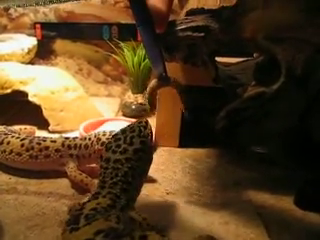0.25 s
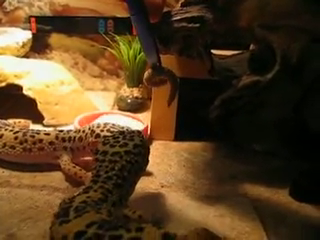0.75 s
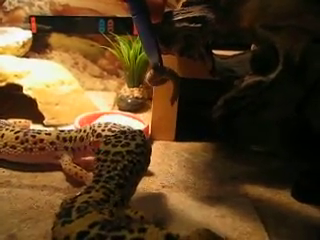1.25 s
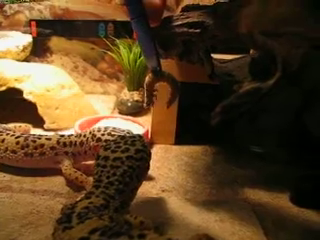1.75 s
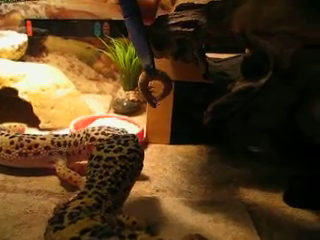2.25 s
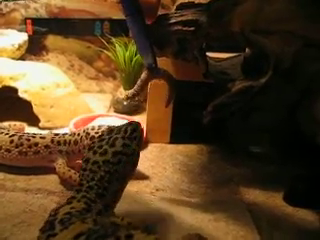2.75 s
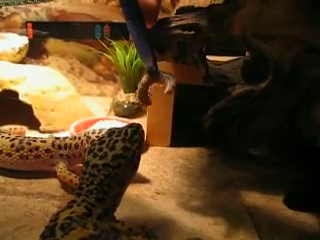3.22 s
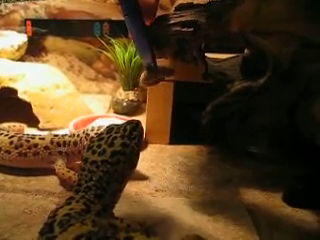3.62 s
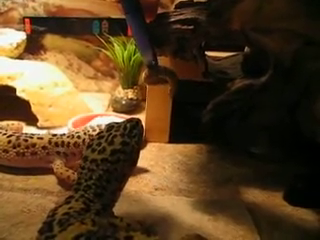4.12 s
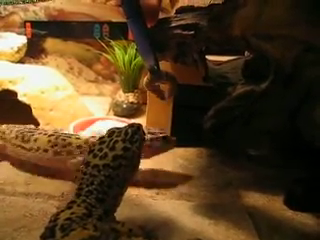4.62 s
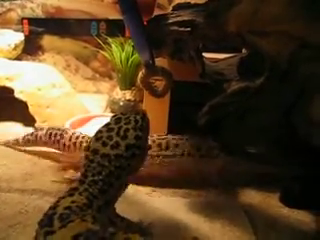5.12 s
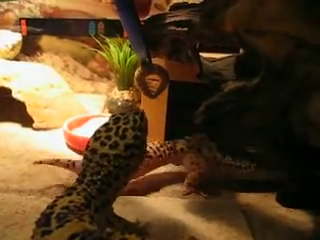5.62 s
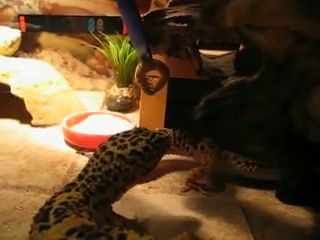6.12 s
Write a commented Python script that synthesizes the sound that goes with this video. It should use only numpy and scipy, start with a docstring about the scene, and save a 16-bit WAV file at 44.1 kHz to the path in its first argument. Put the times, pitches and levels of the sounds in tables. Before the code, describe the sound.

Close plastic clatter clicks unevenly, thins out, then bumps and rubs in a low rumbling swell, above soft hum and hiss.

```python
"""Handled plastic in a small room

A worm is dangled from tongs before a gecko in a tank. Out of sight something clicks, ticks, knocks and
rubs at uneven times, most likely plastic handled close by, with one longer bout of rubbing. Shaped impulses
ring the shell and its hollow body; stick-slip impulses make the rubbing. Filtered noise and wavering
sines make the fan's air and hum and the microphone's hiss underneath."""
import sys
import numpy as np
from scipy import signal
from scipy.fft import rfft, irfft
from scipy.io import wavfile
from scipy.ndimage import uniform_filter1d

SR = 44100
rng = np.random.default_rng(int(sys.argv[2]) if len(sys.argv) > 2 else 0)


def waveform_to_disk(signal):
    """Save audio, clipped to [-1, 1], as 16-bit WAV at the path in sys.argv[1]."""
    frames = np.transpose(np.atleast_2d(signal))
    scaled = np.clip(frames, -1, 1) * 32767
    samples = np.round(scaled).astype(np.int16)
    wavfile.write(sys.argv[1], SR, samples)


N = 280520  # length in samples
TAPS = 8192  # length of an impulse response in samples


def gain_of(db):
    """Logarithmic level: decibels to amplitude."""
    return 10 ** (np.asarray(db) / 20)


def evened(x):
    """Normalisation: x scaled to rms 1."""
    return x / np.sqrt(np.mean(x ** 2) + 1e-20)


def read(points, hz):
    """Interpolation: a curve's value at hz, along a log-frequency axis."""
    f, value = np.transpose(points)
    return np.interp(np.log(hz + 1), np.log(f + 1), value)


def add(mix, s, sound):
    """Superposition: lays a sound into the mix at s seconds."""
    part = mix[max(round(s * SR), 0):][:len(sound)]
    part += sound[:len(part)]


def bins(size):
    """Fourier analysis: the frequencies of a real FFT, in Hz."""
    return np.fft.rfftfreq(size, 1 / SR)


def peak(f, hz, width):
    """Resonance: magnitude of one mode, 1 at its centre, with its half-power width."""
    return 1 / np.sqrt(1 + (2 * (f - hz) / width) ** 2)


def ring(x, db):
    """Causality: a minimum-phase filter with this gain per bin rings only after a blow."""
    cepstrum = irfft(np.log(gain_of(np.maximum(db, -100))))
    # folding the cepstrum onto positive time makes the response causal
    cepstrum[1:TAPS // 2] *= 2
    cepstrum[TAPS // 2 + 1:] = 0
    response = irfft(np.exp(rfft(cepstrum)))
    return signal.fftconvolve(x, response)[:len(x)]


def noise(magnitude):
    """Spectral shaping: steady noise of rms 1 with the given spectrum."""
    spectrum = rfft(rng.standard_normal(N)) * magnitude
    return evened(irfft(spectrum, N))


# Steady air and hiss spectrum: hz [Hz], relative_level_db [dB]
AIR_SPECTRUM = [(15, -37), (25, -15), (65, -0.5), (90, -10.5), (123, -7), (195, -10.5), (227, 1), (325, -7),
                (454, -6.5), (633, -12), (955, -12), (1090, -17.5), (2010, -20), (8670, -31),
                (11500, -33.5), (15000, -73), (22000, -120)]
# The fan's blurred resonances: centre_hz [Hz], width_hz [Hz], level_db [dB]
FAN_RESONANCES = [(124.7, 3.1, -71), (219.7, 12, -60.5), (386, 42, -59.5), (466.4, 46, -54),
                  (677, 2.5, -67.5), (993, 12, -70.5), (1455, 87, -68.5), (3930, 8.9, -76.5),
                  (8400, 2000, -73)]
# Mains hum, motor tone and a faint whine: mean_pitch_hz [Hz], level_db [dB]
HUM_TONES = [(59.2, -66.5), (118.4, -60.5), (940.7, -57.5), (8100, -73.5)]


def background(air_db=-49.5, waver_hz=0.89):
    """Broadband flow noise and hiss, resonant fan drone, and frequency-modulated tones that waver slightly."""
    f = bins(N)
    air = gain_of(air_db) * noise(gain_of(read(AIR_SPECTRUM, f)))
    drone = sum(gain_of(db) * noise(peak(f, hz, width) ** 2) for hz, width, db in FAN_RESONANCES)
    waver = waver_hz * noise(peak(f, 0, 1.72) ** 2)  # one slow drift in Hz, shared by all tones
    tones = np.zeros(N)
    for hz, db in HUM_TONES:
        phase = 2 * np.pi * np.cumsum(hz + waver) / SR
        tones += gain_of(db) * evened(np.sin(phase))
    return air + drone + tones


# The room's decay by band: hz [Hz], t60_s [s]
ROOM_DECAY = [(120, 0.57), (400, 0.24), (1000, 0.26), (2700, 0.21), (7000, 0.23), (11000, 0.17)]


def blow(crack_db, early, early_s, crack_s=0.00067, rise_s=0.0023):
    """Reverberation: an impulse arrives as a brief crack, early reflections and a tail dying band by band."""
    t = np.arange(TAPS) / SR
    # sparse random reflections
    scatter = rng.choice([-1., 1.], len(t)) * (rng.random(len(t)) < .25)
    hz, at, z = signal.stft(scatter, SR, nperseg=256)
    decay_db = -60 * at / read(ROOM_DECAY, hz)[:, None]
    tail = signal.istft(z * gain_of(decay_db), SR)[1][:len(t)]
    tail = tail * (1 + early * np.exp(-t / early_s)) * np.minimum(t / 0.0031, 1)
    crack = rng.choice([-1., 1.], len(t)) * np.exp(-t / crack_s) * np.minimum(t / rise_s, 1)
    arrival = evened(tail) + gain_of(crack_db) * evened(crack)
    # the scattered paths ripple the spectrum finely but carry equal energy in every broad band
    broad_db = 10 * np.log10(uniform_filter1d(abs(rfft(arrival)) ** 2, size=36))
    arrival = ring(arrival, -broad_db)
    return arrival / np.sqrt(np.mean(arrival[:TAPS // 12] ** 2))


# Sharp clicks: start_s [s], relative_level_db [dB], thump_db [dB], depth_db over the thump [dB],
# top_hz of the contact's brightness [Hz], spot_hz, the struck spot's own ring [Hz]
CLICK_EVENTS = [(0.126, -46.5, 4, 8, 2200, 990), (0.146, -36.5, -5.5, 1, 2400, 2280),
                (0.303, -36.5, 2, -2.5, 2720, 1550), (0.712, -44.5, 2.5, 10, 3300, 1780),
                (0.735, -37, -1, -6, 3770, 3400), (0.852, -38.5, -2.5, -6, 2840, 2120),
                (0.93, -41, 3.5, 1, 2200, 970), (1.094, -37.5, -6.5, 11, 10900, 2250),
                (1.124, -36.5, 0, 6.5, 2000, 1040), (1.141, -44.5, 2.5, 6, 2300, 1370),
                (1.202, -46.5, 5, 0, 1600, 1460), (1.335, -39.5, 0, -11, 2900, 980),
                (1.355, -28, -11, 9.5, 4600, 1830), (1.514, -39.5, -1, 5, 2710, 3480),
                (1.54, -38.5, -6, 1, 2760, 1595), (2.166, -48, -6, 7, 2600, 1520),
                (2.503, -44.5, 1, -7, 1900, 710), (2.872, -49, 1, 7, 2000, 1510),
                (2.908, -40, 0.5, -4, 1080, 750), (2.998, -26.5, 1.5, -7.5, 2100, 650),
                (3.935, -46, 9, -4, 3380, 2100), (4.289, -28, -1.5, 0, 7400, 3000),
                (4.375, -36, 5.5, 2, 3900, 2020), (4.413, -38, -6, -7, 2200, 1040),
                (4.576, -42.5, -0.5, 14.5, 1500, 1097), (4.6, -39.5, 5.5, -8, 1700, 1140),
                (4.615, -48, 9, -3, 3520, 2070), (4.669, -40, -1, 9, 5170, 2000),
                (4.88, -39, 4.5, 3.5, 2400, 1120), (5.005, -38, 11, -12.5, 3340, 1550),
                (5.018, -42, 1, -9, 3400, 1020), (5.158, -37, -6, -5, 3060, 1670),
                (5.615, -41.5, -12, -5, 2380, 1640), (5.734, -45.5, 1.5, 0, 2700, 1590),
                (5.804, -47.5, 3, 4, 4460, 2600), (6.099, -47, -20, -2, 2700, 1650),
                (6.162, -37.5, 2.5, 0, 10300, 1600), (6.304, -45, -6, -1, 2510, 1540)]
# The plastic shell, rung by every click: centre_hz [Hz], width_hz [Hz], lift_db [dB]
SHELL_MODES = [(251, 89, 3.5), (417, 85, 4.5), (568, 79, 6.5), (720, 190, -0.5), (1410, 60, 3),
               (1573, 66, 4), (1780, 270, 3), (2100, 120, 5), (2960, 150, -2.5), (3510, 340, 4),
               (4920, 330, 4.5)]
# Spectrum common to all clicks: hz [Hz], relative_level_db [dB]
CLICK_SPECTRUM = [(30, 10), (70, 2), (130, 14.5), (185, 10.5), (260, 15.5), (480, 10.5), (800, 10.5),
                  (1500, 8), (2600, 5.5), (4000, 5.5), (5500, 3), (8000, 8.5), (9800, 7), (11500, 3)]
# A moment after each click the plastic settles back with a softer, lower knock
SETTLE_S, SETTLE_HZ, SETTLE_TOP_HZ, SETTLE_THUMP_DB = .009, 1018, 1380, -11.5
SETTLE_DB, SETTLE_FOLLOWS = -43, 0.13  # its relative level: SETTLE_DB plus this share of the click's dB
ROLL_OFF, DULLEST_DB = 5.17, -26.5  # exponent of a contact's treble slope in power, and its floor
# A stronger click cracks more; a brighter one is a tiny scrape and cracks less
CRACK_PER_DB, CRACK_PER_OCTAVE_DB = 0.13, -2
USUAL_CLICK_DB, USUAL_TOP_HZ = -41, 2510


def clicks(trim_db=-.5, crack_db=-7, settle_crack_db=5, ring_share=0.2, near_s=0.041,
           lift_db=6, settle_lift_db=12):
    """Impact excitation: a blow rings shell and spot; heavier contacts thump more, harder are brighter."""
    f, out = bins(TAPS), np.zeros(N)
    shell_db = read(CLICK_SPECTRUM, f)
    shell_db = shell_db + sum(db * peak(f, hz, width) ** 2 for hz, width, db in SHELL_MODES)
    near = np.exp(-(np.arange(TAPS) / SR / near_s) ** 2)

    def contact(thump, depth, top_hz, spot_hz, lift, crack):
        """Contact filtering: one touch sets the bass, the treble limit and the spot's ring."""
        bass_db = read([(190, thump + depth), (420, thump), (850, 0)], f)
        treble_power = 1 / (1 + (f / top_hz) ** ROLL_OFF) + gain_of(DULLEST_DB) ** 2
        treble_db = 10 * np.log10(treble_power)
        arrival = blow(crack_db=crack, early=0.94, early_s=0.017)
        # plastic is well damped: the struck spot rings broadly and only at first
        spot_db = lift * peak(f, spot_hz, ring_share * spot_hz) ** 2
        arrival = ring(arrival * near, spot_db) + arrival * (1 - near)
        return gain_of(trim_db) * ring(arrival, shell_db + bass_db + treble_db)

    for s, db, thump, depth, top_hz, spot_hz in CLICK_EVENTS:
        strength_db = CRACK_PER_DB * (db - USUAL_CLICK_DB)
        brightness_db = CRACK_PER_OCTAVE_DB * np.log2(top_hz / USUAL_TOP_HZ)
        crack = crack_db + strength_db + brightness_db
        add(out, s, gain_of(db) * contact(thump, depth, top_hz, spot_hz, lift_db, crack))
        settle = contact(SETTLE_THUMP_DB, 0, SETTLE_TOP_HZ, SETTLE_HZ, settle_lift_db, settle_crack_db)
        add(out, s + SETTLE_S, gain_of(SETTLE_DB + SETTLE_FOLLOWS * db) * settle)
    return out


# Thin high ticks: start_s [s], level_db [dB], pitch_hz [Hz], crack_db, strength of the first crack [dB]
TICK_EVENTS = [(0.549, -49, 9200, -6), (2.298, -58.5, 6900, -16), (2.745, -54.5, 8700, -3),
               (2.998, -41, 4900, 18), (3.151, -54, 7460, -6), (3.935, -54, 3350, 6),
               (4.880, -53.5, 5110, 12), (5.017, -47, 5540, 19), (5.158, -56, 5250, 13),
               (6.162, -44, 5700, 22)]
TICK_DAMPING_HZ = 27000  # a tick's width is its pitch squared over this: higher rings are more damped


def ticks():
    """Damped resonance: a brief blow rings one high mode; some ticks stand alone, others are the shell's high
    ring sounding with a click."""
    f, out = bins(TAPS), np.zeros(N)
    for s, db, hz, crack in TICK_EVENTS:
        mode_db = 40 * np.log10(peak(f, hz, hz ** 2 / TICK_DAMPING_HZ))
        tick = ring(blow(crack_db=crack, early=.1, early_s=.01), mode_db)
        opening_rms = np.sqrt(np.mean(tick[:TAPS // 16] ** 2))
        add(out, s, gain_of(db) * tick / opening_rms)
    return out


# The hollow body, rung by bumps and rubbing: centre_hz [Hz], width_hz [Hz], relative_level_db [dB]
BODY_MODES = [(41.6, 10, -9), (92, 8.3, -3), (134, 23, -2), (234, 10, -4.5), (258.5, 12, 2),
              (326, 42, -6.5), (390.5, 86, -3.5), (463, 67, -6), (563, 65, -8)]
# Spectrum of a soft push: hz [Hz], relative_level_db [dB]
PUSH_SPECTRUM = [(25, 1.5), (100, 2.5), (500, -2.5), (800, -2), (1500, 7.5), (3000, 12), (9000, -87)]


def body_db(f):
    """Modal summation: gain of the hollow body under a soft push, its modes added in power."""
    power = sum((gain_of(db) * peak(f, hz, width)) ** 2 for hz, width, db in BODY_MODES)
    return 10 * np.log10(power) + read(PUSH_SPECTRUM, f)


# Dull bumps: start_s [s], relative_level_db [dB], push_hz, centre of the push [Hz]
BUMP_EVENTS = [(2.212, -37.5, 238), (2.894, -33, 254), (3.445, -31.5, 400), (3.557, -30.5, 268),
               (3.783, -33, 235), (4.114, -34, 253), (4.167, -28.5, 260), (4.221, -27.5, 240),
               (4.262, -24, 265), (4.374, -24, 272), (4.408, -21, 248), (4.46, -30, 312), (4.496, -21, 417),
               (4.532, -27.5, 280), (4.867, -34, 346), (5.155, -29.5, 129), (5.660, -28, 264),
               (5.787, -31, 262), (6.047, -36, 294), (6.159, -22, 144)]


def bumps(trim_db=-3.0, focus_db_per_octave=7.0):
    """Selective modal excitation: soft pushes ring mostly the body modes near the speed of the push."""
    f, out = bins(TAPS), np.zeros(N)
    hollow_db = body_db(f)
    for s, db, hz in BUMP_EVENTS:
        octaves_away = np.minimum(abs(np.log2((f + 1) / hz)), 2)
        push_db = -focus_db_per_octave * octaves_away
        arrival = blow(crack_db=10.5, early=0.23, early_s=0.013, crack_s=0.007)
        thud = ring(arrival, hollow_db + push_db)
        loudest = np.sqrt(uniform_filter1d(thud ** 2, size=350).max())  # highest short-term rms
        add(out, s, gain_of(db + trim_db) * thud / loudest)
    return out


SWELL_DB = 17  # a stroke rises by this much over its swell and falls by as much over its fade


def push(t, s, db, swell_s, fade_s):
    """Force envelope: one stroke swells to its hardest push and fades."""
    away = np.maximum((s - t) / swell_s, (t - s) / fade_s)
    return gain_of(db - SWELL_DB * away ** 1.26)


# Rubbing strokes: hardest_push_s [s], relative_level_db [dB], swell_s [s], fade_s [s]
RUB_STROKES = [(2.25, -41.5, 0.05, 0.17), (3.72, -35, 0.4, 0.3), (4.39, -25, 0.39, 0.41)]
# Spectrum of the fine grit: hz [Hz], relative_level_db [dB]
GRIT_SPECTRUM = [(200, -8), (700, 12), (1200, 3.5), (2500, 1.5), (5000, -14), (9000, -7.5), (12000, -14)]


def rubbing(slips_per_s=180, rumble_db=-7.0, grit_db=-19, lumps_hz=22,
            snags_per_s=25, snag_db=-30, snag_hz=2300, snag_width_hz=2200):
    """Stick-slip friction: small catches shake the body in lumps, under fine grit and crackling snags."""
    t, f = np.arange(N) / SR, bins(TAPS)
    force = sum(push(t, *stroke) for stroke in RUB_STROKES)
    # the size of the catches varies slowly with the grip and at random from one to the next
    grip_db = 3 * np.tanh(noise(peak(bins(N), 0, 2 * lumps_hz) ** 2))
    sizes = gain_of(grip_db + rng.uniform(-4, 4, N)) * rng.choice([-1., 1.], N)
    slips = sizes * (rng.random(N) < slips_per_s / SR)
    echoes = signal.fftconvolve(slips, blow(crack_db=-18.5, early=0.55, early_s=0.0041))[:N]
    slips = evened(slips) + 1.78 * evened(echoes)
    rumble = gain_of(rumble_db) * evened(ring(slips, body_db(f)))
    grit = gain_of(grit_db) * evened(ring(slips, read(GRIT_SPECTRUM, f)))
    snag_mode_db = 40 * np.log10(peak(f, snag_hz, snag_width_hz))
    snag = ring(blow(crack_db=2, early=.6, early_s=.012), snag_mode_db)
    catches = sizes * (rng.random(N) < snags_per_s / SR)
    snags = gain_of(snag_db) * evened(signal.fftconvolve(catches, snag)[:N])
    return force * (rumble + grit + snags)


def scene():
    """Linear superposition: all sources sum at one microphone."""
    return (background() + clicks() + ticks() + bumps() + rubbing())[None]


def record(dry, edge_hz=11400):
    """Band limitation: a linear-phase low-pass removes the treble above its edge."""
    low_pass = signal.firwin(101, edge_hz, window=("kaiser", 7), fs=SR)
    return signal.oaconvolve(dry, low_pass[None], "same")


dry = scene()
out = record(dry)
waveform_to_disk(out)
```